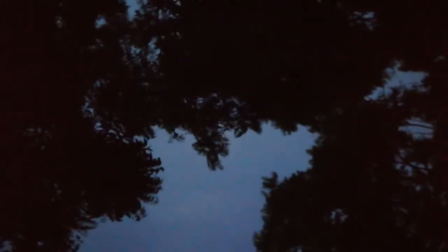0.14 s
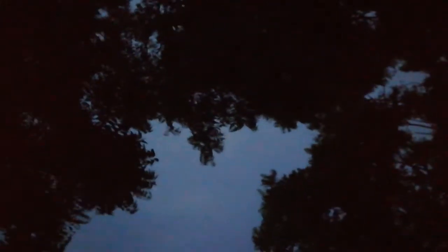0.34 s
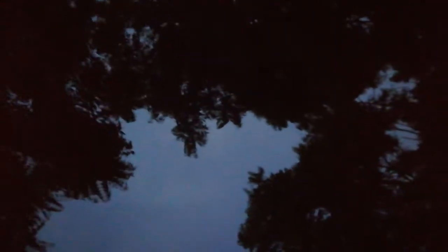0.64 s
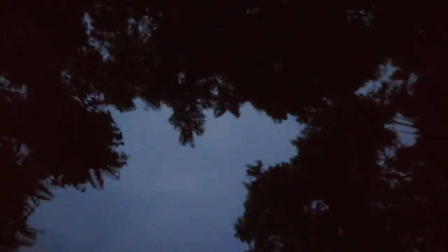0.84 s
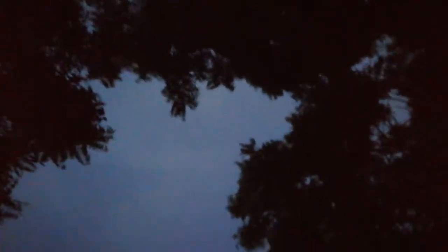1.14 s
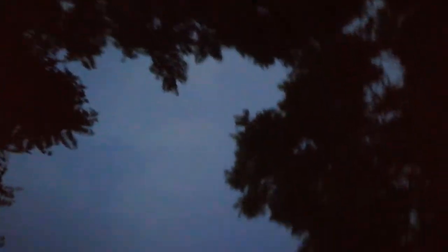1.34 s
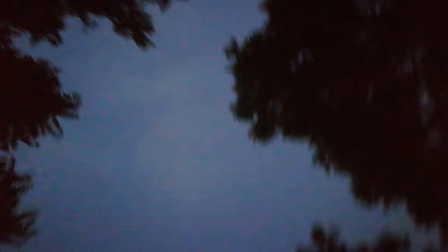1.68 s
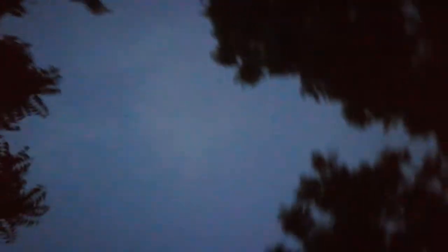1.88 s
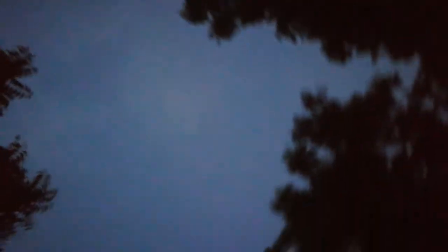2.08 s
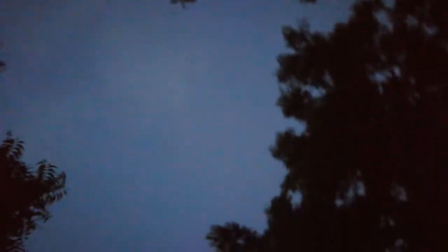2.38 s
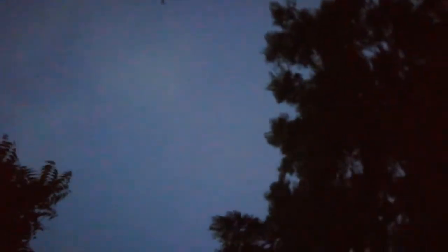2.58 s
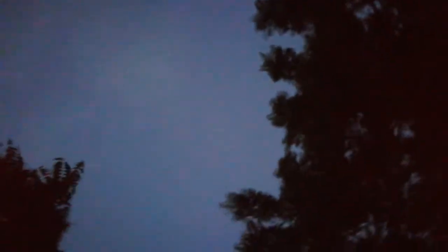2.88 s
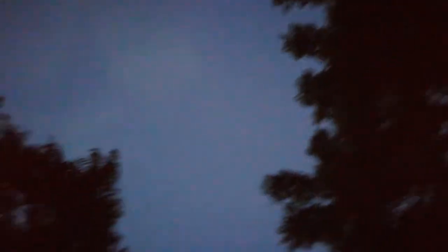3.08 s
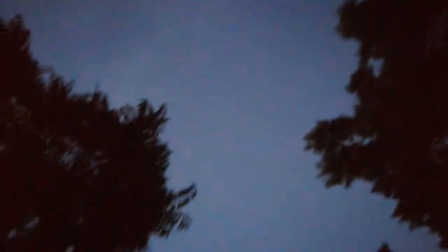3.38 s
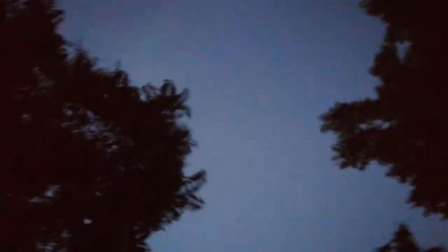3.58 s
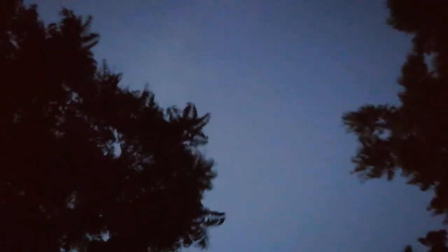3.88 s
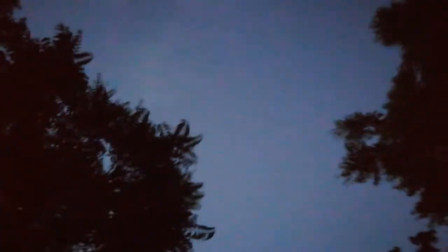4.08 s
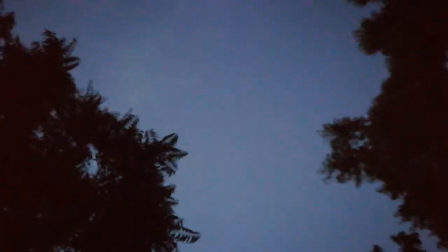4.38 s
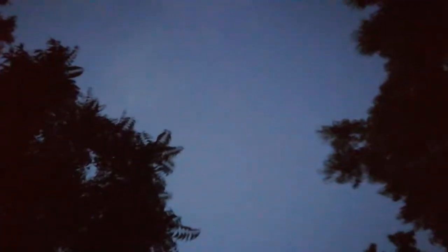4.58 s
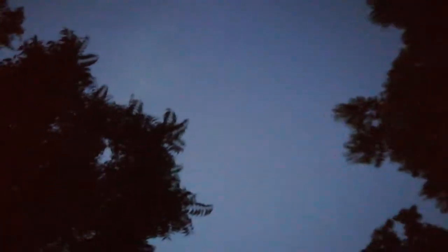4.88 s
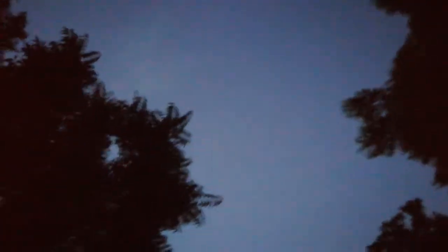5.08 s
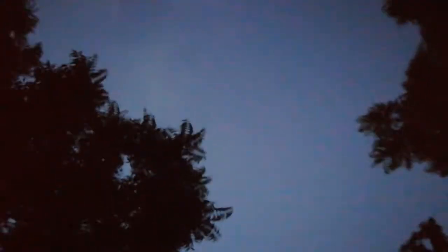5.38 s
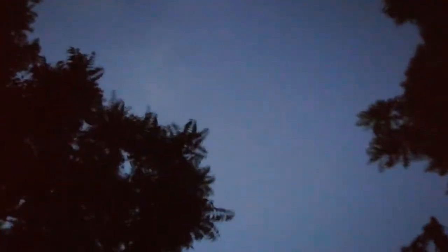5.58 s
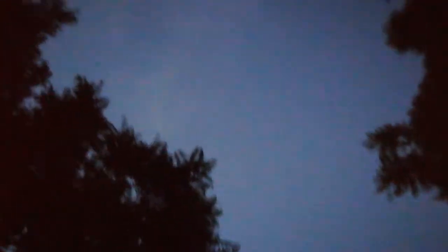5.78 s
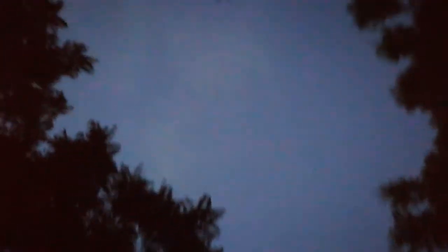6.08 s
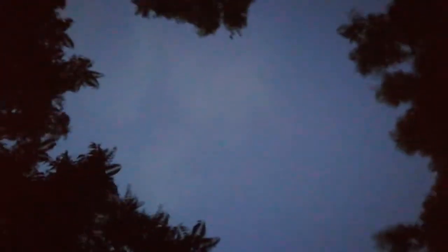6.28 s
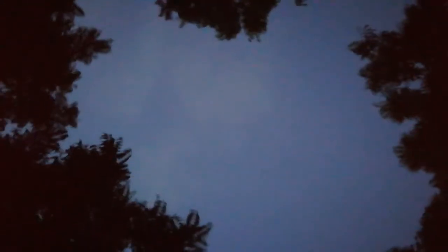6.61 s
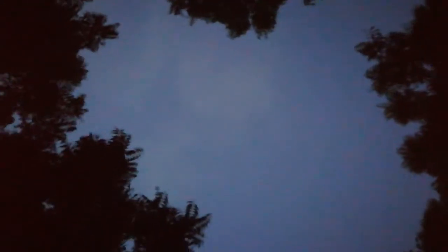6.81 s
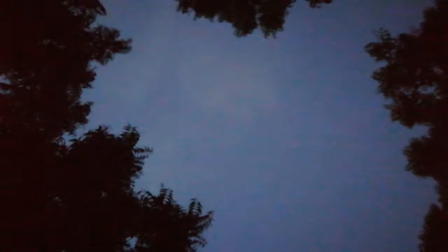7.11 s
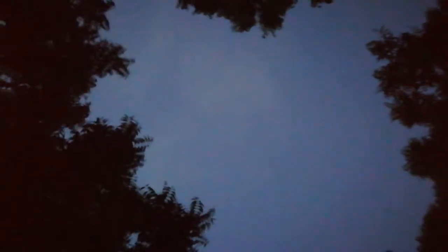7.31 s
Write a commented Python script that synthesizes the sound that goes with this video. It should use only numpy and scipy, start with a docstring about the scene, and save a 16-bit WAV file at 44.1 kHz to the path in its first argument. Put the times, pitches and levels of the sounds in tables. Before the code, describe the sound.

A dawn chorus sounds among trees for about seven and a half seconds, heard in stereo. Small birds chirp and whistle throughout, high and short, over the soft hissing murmur of a distant flock. Crows give hoarse, rattling caws, each under half a second or so, with a short scatter off trunks and leaves. The first caws are softer and slightly left; louder ones overlap around 2.2 seconds and return near 3.1. A light breeze thuds on the microphone at about 2.7 and 3.5 seconds. From 4 to 6 seconds the crows call in quick succession from the right, while the songbirds grow brighter, with a brief trill at 4.2 and a long falling chirp at 5.4. The loudest caw comes at 6.3 seconds, and more follow to the end. Far traffic rumble and a faint electrical hum stay underneath.

```python
"""Crows caw all round among trees at dawn: hoarse overtones through a throat resonance, plus rasp.
Songbirds slide, whistle, trill and chirp in near-sine tones above a far murmuring flock.
Trunks and leaves scatter every call. A light breeze thuds on two microphones a hand apart;
far traffic rumbles with a faint mains hum."""
import sys
import numpy as np
from scipy import signal
from scipy.fft import rfft, irfft
from scipy.io import wavfile
from scipy.ndimage import uniform_filter1d

SR = 44100
rng = np.random.default_rng(int(sys.argv[2]) if len(sys.argv) > 2 else 0)


def wav_record(signal):
    """Record a signal, one row per channel, as 16-bit PCM in the file named by sys.argv[1]."""
    frames = np.transpose(np.atleast_2d(signal))
    bounded = np.clip(frames, -1, 1)
    # unit amplitude maps onto the largest positive 16-bit level
    quanta = np.round(bounded * 32767).astype(np.int16)
    wavfile.write(sys.argv[1], SR, quanta)


N = 328545


def caw(start_s, peak_s, end_s, level_db, throat_hz, pitch_hz, low_db, rasp_db):
    """Hoarse harmonics through a throat resonance; each cycle gates a rasp, and both rattle unevenly."""
    sag, jitter, roughness = .13, .015, .6
    throat_width_hz, rasp_hz = 530, (4500, 9500)
    rattle_hz, rattle_depth = 95, .4
    rise_db, fall_db = 11.5, 9.5
    t = np.arange(start_s, end_s, 1 / SR)
    n = len(t)
    hz = pitch_hz * (1 - sag * np.abs(np.linspace(-1, 1, n)) ** 3)
    phase = 2 * np.pi * np.cumsum(hz * (1 + jitter * walk(89.86, n))) / SR
    order = np.arange(2, 8)[:, None]
    gain = 1 / (1 + ((order * hz - throat_hz) / throat_width_hz) ** 2) ** 2
    gain = gain / np.sqrt(np.sum(gain ** 2, axis=0)) + undb(low_db) * (order == 2)
    voice = sum(g * hoarse(k * phase, roughness, 430) for k, g in zip(order[:, 0], gain))
    rattle_phase = 2 * np.pi * np.cumsum(rattle_hz * (1 + .1972 * walk(25, n))) / SR
    rattle = 1 + rattle_depth * np.cos(rattle_phase)
    rasp = band(rng.standard_normal(n) * (1 + np.cos(phase)), *rasp_hz, order=1)
    from_peak = np.interp(t, [start_s, peak_s, end_s], [-1, 0, 1])
    effort_db = -np.where(from_peak < 0, rise_db, fall_db) * np.abs(from_peak) ** 1.73
    sound = undb(effort_db) * unit(voice) + undb(rasp_db + .92 * effort_db) * unit(rasp)
    return undb(level_db) * sound * rattle * signal.windows.tukey(n, .15)


def crows():
    """Caws from both sides, some overlapping."""
    # caws: start/s, peak/s, end/s, level/dB, throat/Hz, pitch/Hz, added 2nd harmonic/dB, rasp/dB, L-R/dB
    caws = [(0.0, 0.092, .22, -48.5, 1960, 408, -6, -6, 8),
            (0.201, 0.337, .74, -43, 1590, 399.6, -24, -33, 3),
            (0.982, 1.34, 1.45, -41, 1820, 397.7, -23, -19.5, 3),
            (1.402, 1.474, 1.82, -43.5, 1940, 441.4, -13.5, -14, 4.5),
            (2.081, 2.257, 2.43, -36, 1650, 389.3, -33, -11.5, 3),
            (2.143, 2.28, 2.4, -34, 1870, 469.7, -18, -13.5, 6),
            (2.378, 2.432, 2.6, -43, 1770, 453.4, -31, -36, 4),
            (2.918, 3.13, 3.27, -34, 1730, 385.6, -24, -13, 4),
            (3.219, 3.327, 3.54, -38, 1720, 436.2, -22, -23.5, 2),
            (3.551, 3.616, 3.86, -45, 1630, 442, -19, -23, 2.5),
            (4.063, 4.262, 4.45, -37.5, 1690, 498.4, -44, -15.5, -4),
            (4.333, 4.49, 4.7, -37.5, 1610, 487.5, -48, -17, -4.5),
            (4.666, 4.912, 5.0, -37.5, 1850, 451.6, -31, -26, -2),
            (4.88, 5.147, 5.31, -35, 1870, 503, -27, -17.5, -5.5),
            (5.377, 5.48, 5.74, -36.5, 1715, 442, -26, -17.5, -3),
            (5.639, 5.785, 6.02, -39.5, 1750, 379.3, -18.5, -15.5, -3),
            (6.152, 6.307, 6.49, -29.5, 1890, 472.2, -17.5, -20.5, 2.5),
            (6.419, 6.55, 6.7, -37.5, 1960, 484.8, -42, -23, -3.5),
            (6.641, 6.793, 6.82, -42.5, 1630, 499.4, -28, -15, 0.5),
            (6.782, 6.894, 7.02, -36, 1780, 425.3, -13.5, -18, -4),
            (6.962, 7.01, 7.14, -44, 2080, 366.6, -20, -15.5, 2),
            (7.202, 7.386, 7.5, -36.5, 1750, 505.7, -29, -20, -0.5)]
    out = np.zeros((2, N))
    for start_s, *voice, pan_db in caws:
        place(out, start_s, caw(start_s, *voice), pan_db)
    return out


def bird_tone(hz, overtone_db, roughness, taper=.45):
    """A near sine, two weaker, hoarser overtones and breath hissing past the beak."""
    breath_db, breath_hz = -19.5, (2800, 11500)
    n = len(hz)
    phase = 2 * np.pi * np.cumsum(hz * (1 + .0054 * walk(152, n))) / SR
    tone = hoarse(phase, roughness, 300 + 250 * roughness)
    tone += undb(overtone_db) * hoarse(2 * phase, 1.4 * roughness, 700)
    rolloff = np.clip(1 - (3 * hz / 14000) ** 6, 0, 1)
    tone += undb(overtone_db - 5) * rolloff * hoarse(3 * phase, 1.6 * roughness, 900)
    tone += undb(breath_db) * roughness * unit(band(rng.standard_normal(n), *breath_hz))
    return np.sqrt(2) * tone * signal.windows.tukey(n, taper)


def whistles_and_caw_overtones():
    """Songbird whistles, plus hoarse ringing overtones of crow caws; sliding or held."""
    # sliding tones: t/s, length/s, start/Hz, end/Hz, level/dB, overtone/dB, roughness, L-R/dB
    slides = [(0.05, 0.064, 3180, 2650, -45.5, -24, 0.5, 4), (0.272, 0.022, 4340, 4900, -47, -21, .3, -1),
              (1.005, 0.073, 3230, 3450, -59, -30, 0.6, 4),
              (1.46, 0.064, 3095, 2350, -43.5, -15, 0.23, 4.5),
              (2.924, 0.053, 3100, 3460, -56.5, -26, .3, 5), (2.969, .23, 3720, 4350, -46.5, -28, 1.07, 4),
              (3.395, 0.064, 3650, 3970, -50.5, -14, 0.9, 3), (4.118, 0.052, 3660, 3465, -38, -22, 0, 2),
              (4.297, 0.045, 2790, 2730, -35.5, -3, 0.54, 4.5),
              (4.397, 0.088, 5050, 5100, -48, -32, 0.53, 5),
              (4.574, 0.094, 3710, 3616, -38.5, -22, 0.33, 3.5),
              (4.56, 0.12, 5540, 5360, -50, -32, 0.46, 9), (4.652, 0.085, 2775, 2617, -36, -3.5, 0.41, 6),
              (4.973, 0.065, 3360, 4640, -36.5, -34, 0.5, 3.5),
              (4.99, 0.063, 3720, 3444, -35, -17, 1.8, -1), (5.095, .105, 3280, 3370, -36, -11, .4, 0),
              (5.956, 0.037, 5500, 4830, -55, -26, .6, 11), (5.156, 0.09, 3360, 3250, -42, -3, 0.99, 6.5),
              (6.378, .06, 3200, 1950, -38, -5, 0.3, 2), (6.84, 0.075, 4500, 2700, -49, -26, .3, 0),
              (7.04, 0.1, 2235, 2130, -50, -30, 0.43, 9), (7.222, 0.039, 3520, 2080, -56, -26, 0.55, 23)]
    # held tones: t/s, length/s, f/Hz, level/dB, overtone/dB, roughness, L-R/dB
    held = [(.33, 0.072, 2526, -44.5, -30, 0.24, -8.5), (0.495, 0.066, 4950, -43.5, -16, 0.42, 2.5),
            (0.502, 0.18, 3225, -48, -15, 0.97, 3), (0.525, 0.038, 6360, -58, -32, .9, 8),
            (0.67, 0.1, 2640, -55.5, -22, 0.3, 2), (.97, .12, 2840, -53.5, -30, 0.67, 0.5),
            (1.07, .06, 3400, -61, -25, .6, 4), (1.265, 0.048, 4500, -57, -30, 0.5, 3),
            (1.257, 0.15, 2770, -50.5, -15, 0.2, -4.5), (1.48, 0.2, 2127, -40.5, -24, 0.35, 5),
            (2.253, 0.14, 4710, -52, -33, 1.07, 2), (2.399, 0.099, 2615, -48, -25, .1, 3),
            (2.477, 0.093, 4590, -59, -26, 0.74, 18), (2.5, 0.16, 2644, -46.5, -34, 0.04, 2.5),
            (2.664, 0.05, 2635, -46, -37, 0.3, 13), (2.725, 0.075, 2650, -44.5, -36, 0, 12),
            (2.802, 0.18, 2634, -54, -30, 0.04, 7.5), (3.489, 0.061, 2600, -44, -16, 0.5, 2),
            (4.07, 0.042, 3980, -49.5, -26, 0.4, 15), (4.144, 0.078, 2670, -42, -8, 0.35, 10.5),
            (4.65, 0.026, 6040, -41, -17, 0.75, 2), (5.14, 0.065, 5050, -42, -22, 1.5, 2.5),
            (5.546, 0.052, 2566, -41.5, -28, 0.01, -0.5), (5.799, .073, 2880, -49.5, -26, 0.63, 7),
            (6.06, 0.068, 2795, -53.5, -9, 0.47, 15), (6.274, 0.082, 5180, -51.5, -30, 0.5, 6),
            (6.345, 0.031, 3190, -48, -26, 0.9, 12), (6.383, 0.091, 6100, -50.5, -30, 0.8, 11),
            (6.388, 0.041, 4630, -54, -30, .6, 4), (6.64, .03, 3030, -53, -26, .4, 7),
            (6.939, 0.068, 2654, -49.5, -15, 0.4, 17), (7.287, 0.043, 2930, -54, -30, 0.44, 18),
            (7.302, 0.085, 4340, -50.5, -40, 0.38, 2)]
    out = np.zeros((2, N))
    for t, length_s, start_hz, end_hz, level_db, overtone_db, roughness, pan_db in slides:
        middle_hz = start_hz + (end_hz - start_hz) * (.94 if end_hz > start_hz else .5)  # rises arch
        hz = glide(length_s, start_hz, middle_hz, end_hz)
        place(out, t, undb(level_db) * bird_tone(hz, overtone_db, roughness), pan_db)
    for t, length_s, pitch_hz, level_db, overtone_db, roughness, pan_db in held:
        hz = np.full(int(length_s * SR), pitch_hz)
        place(out, t, undb(level_db) * bird_tone(hz, overtone_db, roughness), pan_db)
    return out


def trill():
    """A wide vibrato crosses the throat resonance twice a turn; a trunk echoes it from the right."""
    start_s, length_s, echo_s, pan_db = 4.195, .117, .015, 9
    centre_hz, swing_hz, rate_hz = 3300, 1100, 31.7
    throat_hz, throat_width_hz, ring_width_hz = 3680, 280, 150
    drone_hz, drone_db = 2660, -45  # a second, hoarse voice
    turn = 2 * np.pi * rate_hz * np.arange(0, length_s, 1 / SR) - .4
    hz = centre_hz + swing_hz * np.sin(turn)
    throat_gain = .07 + 1 / (1 + ((hz - throat_hz) / throat_width_hz) ** 2)
    effort_db = -30.5 - 2 * np.cos(turn) - 6 * np.exp(-turn / 4)  # soft start, harder on each fall
    song = undb(effort_db) * throat_gain * bird_tone(hz, overtone_db=-17, roughness=.1, taper=.1)
    ring = band(song, throat_hz - ring_width_hz / 2, throat_hz + ring_width_hz / 2, order=1)
    song += undb(3) * ring
    drone = undb(drone_db) * bird_tone(np.full(len(hz), drone_hz), overtone_db=-7, roughness=2)
    out = np.zeros((2, N))
    place(out, start_s, song + drone, pan_db)
    place(out, start_s + echo_s, undb(-5) * song / np.sqrt(throat_gain) + drone, -pan_db)
    return out


def chirps():
    """Chirps fall and level off towards a resting pitch; the voice thins at the top."""
    # falling chirps: t/s, length/s, start/Hz, end/Hz, level/dB, L-R/dB
    falls = [(.01, 0.041, 4500, 3180, -42, 3), (0.11, 0.052, 4430, 3150, -39.5, 3),
             (0.299, 0.02, 3910, 3560, -40.5, 3), (.85, .055, 4600, 3250, -48, 0),
             (.912, .02, 3600, 3300, -49, 0), (1.188, .05, 3800, 3550, -51, 3.5),
             (2.098, 0.029, 4140, 3060, -48.5, 16), (2.345, 0.065, 4000, 2590, -44.5, 3.5),
             (2.568, 0.044, 4500, 3120, -41.5, 1), (2.69, 0.041, 4400, 2710, -41, -1),
             (2.86, 0.03, 3900, 3500, -55, 3), (2.896, 0.022, 3620, 3020, -43.5, 1),
             (3.049, 0.087, 4180, 2530, -51, 10), (3.196, .018, 3860, 3170, -44.5, 5),
             (3.275, .05, 4300, 3500, -50, 3), (3.308, 0.091, 3340, 2650, -43.5, 3),
             (3.382, 0.075, 4010, 2565, -41.5, 2.5), (3.838, 0.042, 3280, 2650, -42, 4),
             (5.369, 0.19, 5810, 2644, -37, 3.5), (5.621, .11, 3130, 2590, -44, 5),
             (5.92, 0.044, 3370, 3160, -48, 7)]
    rest_hz, thin_above_hz, thin_db_per_khz = 2500, 4200, 4
    out = np.zeros((2, N))
    for t, length_s, start_hz, end_hz, level_db, pan_db in falls:
        middle_hz = rest_hz + np.sqrt((start_hz - rest_hz) * (end_hz - rest_hz))
        hz = glide(length_s, start_hz, middle_hz, end_hz)
        thin_db = thin_db_per_khz * np.maximum(hz - thin_above_hz, 0) / 1000
        place(out, t, undb(level_db - thin_db) * bird_tone(hz, overtone_db=-27, roughness=.2), pan_db)
    return out


def far_chirps():
    """Faint falling chirps at random times and bearings."""
    count, lo_hz, hi_hz = 300, 2700, 5200
    out = np.zeros((2, N))
    for when, height, fall, length, distance, bearing in rng.random((count, 6)):
        top_hz = lo_hz + height ** 3 * (hi_hz - lo_hz)
        hz = glide(.028 + .08 * length, top_hz, top_hz * (1 - .37 * fall), top_hz * (1 - .286 * fall))
        chirp = undb(-56.5 - 4.4 * distance) * bird_tone(hz, overtone_db=-22, roughness=.35)
        place(out, when * (N / SR), chirp, pan_db=8 * (bearing - .5))
    return out


def tree_scatter(calls):
    """Reflections off trunks and leaves: a decaying haze, different at each microphone."""
    t60_s, onset_s, wet_db = .33, .0074, -2.5
    t = np.arange(int(t60_s * SR)) / SR
    haze = rng.standard_normal((2, len(t))) * undb(-60 * t / t60_s) * (1 - np.exp(-t / onset_s))
    haze /= np.sqrt(np.sum(haze ** 2, axis=1, keepdims=True))
    return undb(wet_db) * signal.fftconvolve(calls, haze, axes=1)[:, :N]


def flock_murmur():
    """Far flock, leaves and microphone hiss: third-octave bands swell together and flicker alone."""
    # noise spectrum: f/Hz, relative density/dB
    spectrum = [(35, -75), (60, -8.5), (183, -3.5), (585, -9.5), (792, -2), (1200, -0.5), (1420, 4),
                (1910, 5), (2360, -2), (3120, 0), (4320, -9.5), (5800, -7), (8090, -11), (9300, -21),
                (14500, -21), (15500, -19.5)]
    # treble of the flock: t/s, gain/dB
    treble = [(0, 1.5), (.7, -2.5), (1.0, -4), (1.3, -0.5), (1.7, -2), (1.95, -1.5), (2.3, -0.5),
              (2.8, -2.5), (3.3, 0.5), (4.0, -2), (4.4, 6.5), (4.85, 2), (5.5, 1), (6.05, 1), (6.4, 1),
              (6.7, -0.5), (7.1, -3.5), (7.45, 3.5)]
    level_db, alike_below_hz = -43, 288
    hz = np.maximum(np.fft.rfftfreq(N, 1 / SR), 1)
    knot_hz, knot_db = np.transpose(spectrum)
    colour = undb(np.interp(np.log(hz), np.log(knot_hz), knot_db))
    apart = hz ** 2 / (hz ** 2 + alike_below_hz ** 2)
    mid, side = rfft(rng.standard_normal((2, N))) * colour * np.sqrt([2 - apart, apart])
    stereo = np.array([mid + side, mid - side])
    swell_db, treble_db = .7 * walk(2.95, N), curve(treble)
    out = np.zeros((2, N))
    for octave in np.arange(5, 14.5, 1 / 3):  # log2(f/Hz)
        share = np.clip(1 - 3 * np.abs(np.log2(hz) - octave), 0, 1)
        in_bird_range = 11.6 < octave < 13.2
        flicker_db = (2.1 if in_bird_range else 1.2) * walk(6, N)
        out += irfft(stereo * share, N) * undb(swell_db + flicker_db + in_bird_range * treble_db)
    return unit(out) * undb(level_db)


def wind():
    """Gusts thud on the housing, almost the same in both microphones."""
    # gusts: t/s, level/dB
    gusts = [(0.0, -58), (0.44, -51.5), (0.58, -65), (1.06, -50.5), (2.2, -63), (2.68, -55), (2.72, -42),
             (2.77, -53.5), (3.5, -40.5), (3.65, -57.5), (7.18, -65.5), (7.45, -61)]
    mid, side = band(rng.standard_normal((2, N)), 24.6, 74) * undb(3 * walk(28, N))
    return (unit(mid) + undb(-18) * unit(side) * np.array([[1], [-1]])) * undb(curve(gusts))


def town():
    """Far traffic rumble and faint mains hum, nearly alike in both microphones."""
    # traffic: t/s, level/dB
    traffic = [(0.0, -58.5), (0.33, -58.5), (2.45, -57.5), (7.32, -55), (7.45, -58)]
    hum_hz, hum_db = 100, -61
    mid, side = band(rng.standard_normal((2, N)), 45, 223)
    rumble = unit(mid + undb(-39) * side * np.array([[1], [-1]])) * undb(curve(traffic))
    hum = undb(hum_db + 4.1 * walk(16, N)) * np.sin(2 * np.pi * hum_hz * np.arange(N) / SR)
    return rumble + hum


def hoarse(phase, roughness, rate_hz):
    """A partial with a share of its power (roughness, capped at 1) shaken into noisy sidebands."""
    share = np.clip(roughness, 0, 1)
    shake = (walk(rate_hz, len(phase)) + 1j * walk(rate_hz, len(phase))) / np.sqrt(2)
    return np.imag((np.sqrt(1 - share) + np.sqrt(share) * shake) * np.exp(1j * phase))


def glide(length_s, start_hz, middle_hz, end_hz):
    """Pitch through three points: a power curve if they fall in turn, else a parabola."""
    u = np.linspace(0, 1, int(length_s * SR))
    if start_hz > middle_hz > end_hz:
        bend = np.log2((start_hz - end_hz) / (middle_hz - end_hz))
        return end_hz + (start_hz - end_hz) * (1 - u) ** bend
    return np.polyval(np.polyfit([0, .5, 1], [start_hz, middle_hz, end_hz], 2), u)


def place(out, start_s, sound, pan_db):
    """Mix a sound in; the nearer microphone hears it louder and earlier."""
    spacing_s = .0006  # travel time between the microphones
    lead_s = spacing_s * np.tanh(pan_db / 2) / 2
    for mic, side in enumerate((1, -1)):
        i = max(int((start_s - side * lead_s) * SR), 0)
        out[mic, i:i + len(sound)] += undb(side * pan_db / 2) * sound[:N - i]


def walk(rate_hz, size):
    """Random levels joined by ramps, RMS 1."""
    hold = max(int(SR / rate_hz), 2)
    steps = np.repeat(rng.standard_normal(size // hold + 1), hold)
    return unit(uniform_filter1d(steps, hold)[:size])


def curve(points):
    return np.interp(np.arange(N) / SR, *np.transpose(points))


def band(x, lo_hz, hi_hz, order=2):
    return signal.sosfilt(signal.butter(order, [lo_hz, hi_hz], "bandpass", fs=SR, output="sos"), x)


def undb(db):
    return 10 ** (np.asarray(db) / 20)


def unit(x):
    return x / np.sqrt(np.mean(x ** 2))


def scene():
    """Direct and scattered calls over flock, wind and town."""
    calls = crows() + whistles_and_caw_overtones() + far_chirps()
    near = trill()
    hidden = chirps()  # behind leaves: less direct sound, a larger share of scatter
    direct = calls + near + undb(-3) * hidden
    scatter = tree_scatter(calls + undb(-1) * near + undb(-.5) * hidden)
    return direct + scatter + flock_murmur() + wind() + town()


def record(dry):
    """Left microphone: ringing sound hole, dull top. Right: shaded by the housing. Both low-passed."""
    port_hz, port_db = (7750, 8550), 5
    dull_hz, dull_db = (10000, .45 * SR), -4
    shade_hz, shade_db = (7100, 9000), -12
    cutoff_hz = 15650
    left, right = dry
    ring = (undb(port_db) - 1) * band(left, *port_hz, order=1)
    dulling = (undb(dull_db) - 1) * band(left, *dull_hz)
    shade = (undb(shade_db) - 1) * band(right, *shade_hz, order=1)
    lowpass = signal.ellip(10, .2, 80, cutoff_hz, fs=SR, output="sos")
    return signal.sosfilt(lowpass, np.array([left + ring + dulling, right + shade]))


dry = scene()
out = record(dry)
wav_record(out)
```